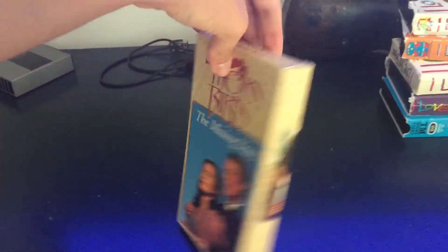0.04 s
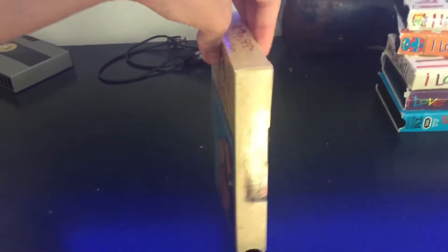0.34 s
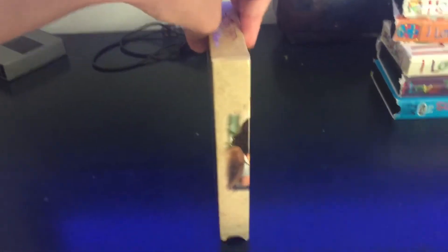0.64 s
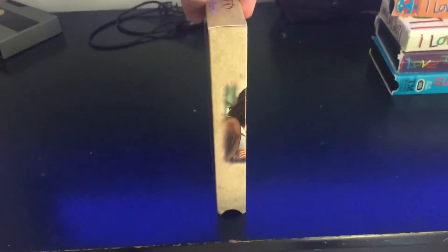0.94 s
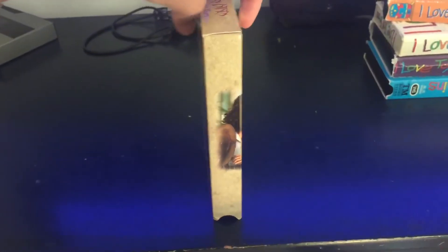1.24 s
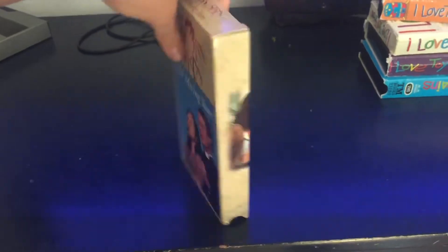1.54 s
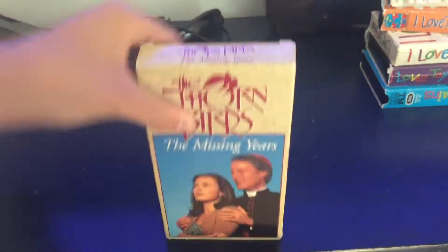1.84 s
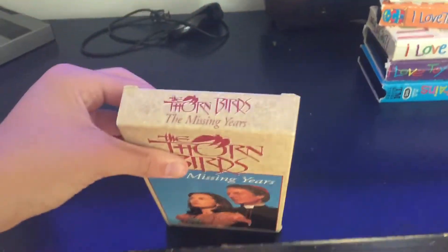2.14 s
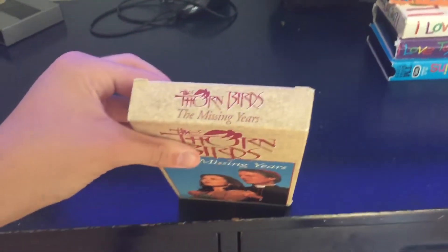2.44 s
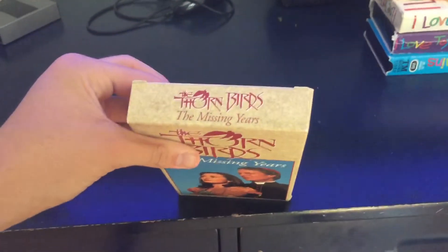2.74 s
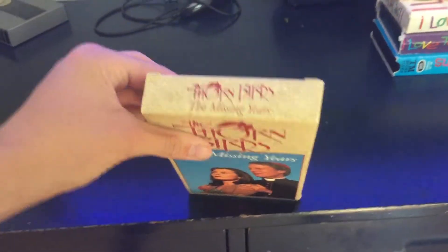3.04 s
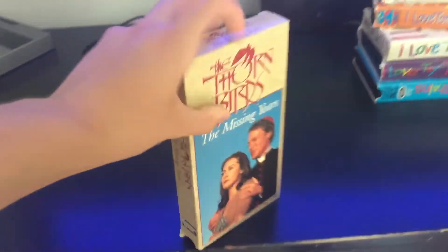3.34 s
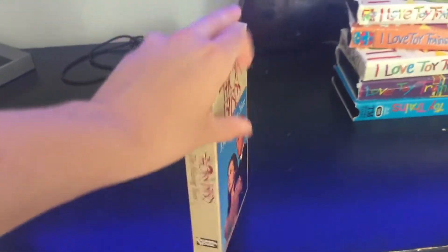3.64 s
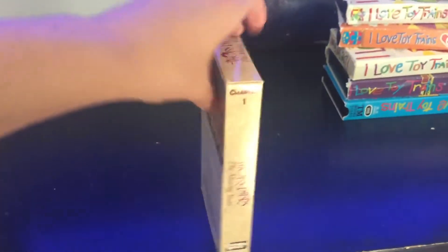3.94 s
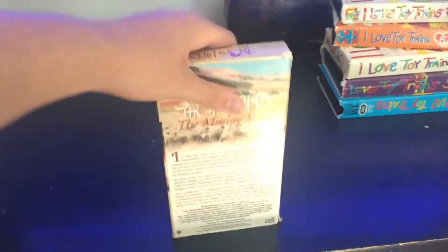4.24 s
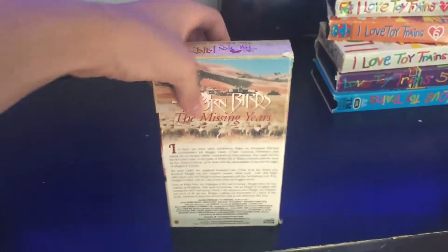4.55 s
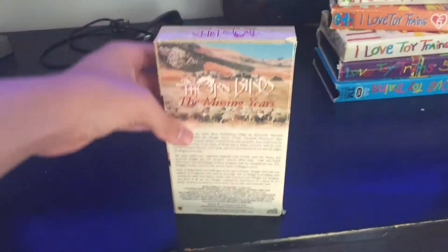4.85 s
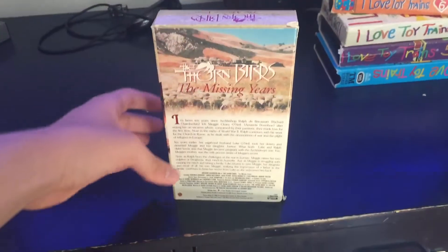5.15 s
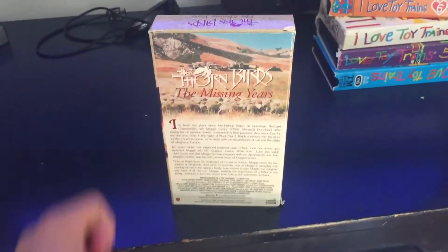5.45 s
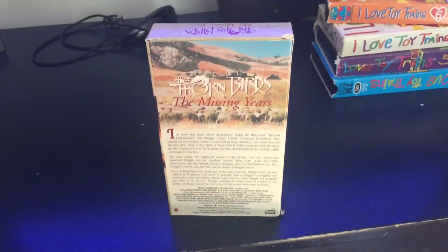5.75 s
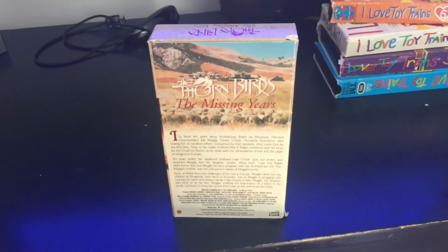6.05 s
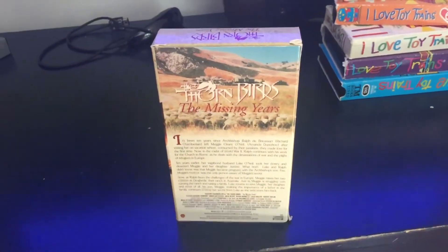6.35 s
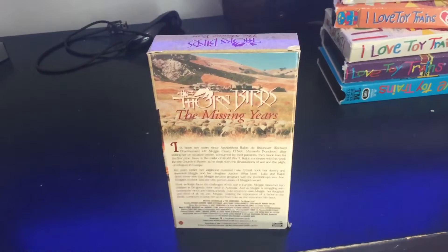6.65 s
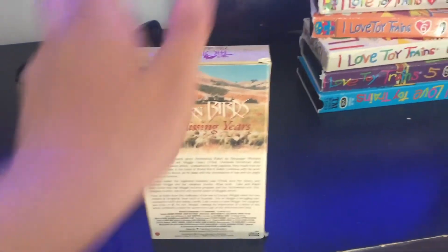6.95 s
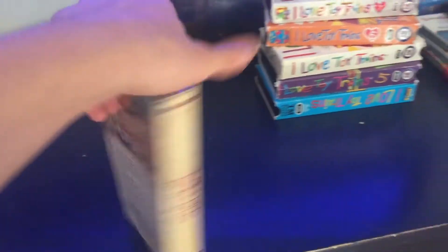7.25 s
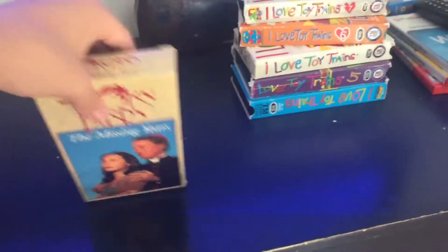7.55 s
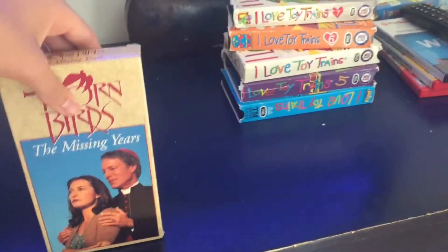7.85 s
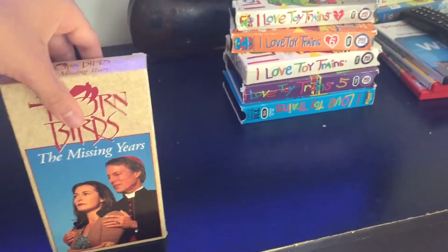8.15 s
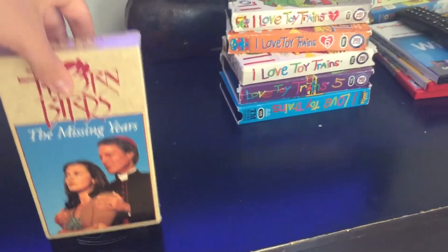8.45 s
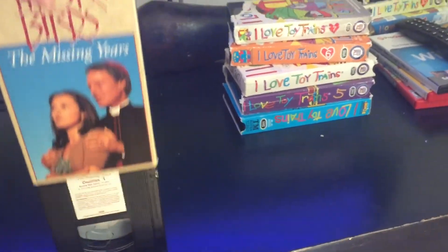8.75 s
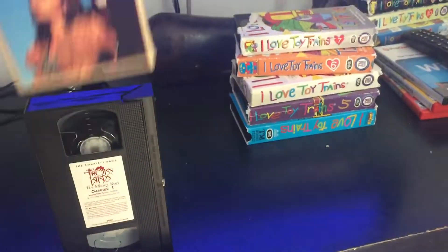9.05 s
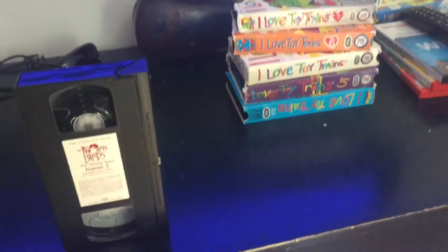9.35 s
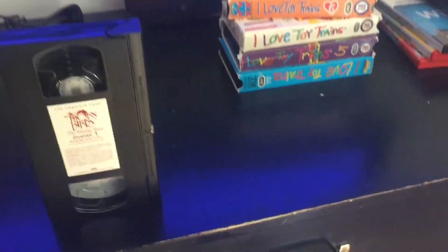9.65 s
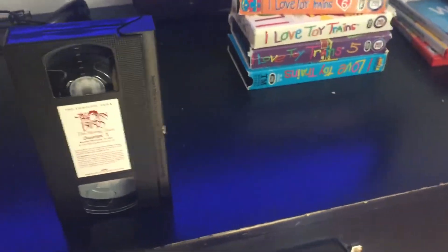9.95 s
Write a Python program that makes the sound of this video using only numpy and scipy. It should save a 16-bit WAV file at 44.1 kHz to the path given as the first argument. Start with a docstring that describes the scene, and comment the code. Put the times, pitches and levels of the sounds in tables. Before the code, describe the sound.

A plastic video cassette in a cardboard sleeve is handled on a desk, heard close in a small room over a faint, wavering low hum. At 0.5 seconds it lands with a firm hollow knock. Light ticks, a soft scuff and a tiny squeak follow around 2 seconds. From 3.2 to 4.5 seconds it is turned with short cardboard rubs and rattly knocks, strongest at 3.4 and 4.3 seconds. Only faint finger ticks come until about 6.2 seconds, then a lull. Scuffs and bumps return at 7.2 seconds, leading to two loud knocks at 7.6 and 7.8 seconds, each thudding in the desk top. From 8.4 seconds the sleeve slides off with a soft, hissing rustle, ending in a hollow pop at 9.1 seconds. The bare cassette gives a small knock at 9.7 seconds and a loud, ringing plastic clack just before 9.9 seconds.

```python
"""A plastic video cassette in its cardboard sleeve is turned on a desk, set down and unsleeved.
Each knock rattles the hollow shell, cracks at the edge and thuds in the desk top.
Cardboard rubs in tiny slips: scuffs, squeaks, then one long pull that ends in a hollow pop.
A small room rings after every contact, over a faint wavering hum."""
import sys
import numpy as np
from scipy import signal
from scipy.fft import rfft, irfft
from scipy.io import wavfile
from scipy.ndimage import uniform_filter1d

SR = 44100
rng = np.random.default_rng(int(sys.argv[2]) if len(sys.argv) > 2 else 0)


def dump_mix(stems):
    """Bounce the given channels to the path in sys.argv[1] as a 16-bit WAV at rate SR."""
    frames = np.atleast_2d(stems).T  # one column per channel
    limited = np.clip(frames, -1, 1)  # hard clip at full scale
    pcm = np.round(limited * 32767).astype(np.int16)
    wavfile.write(sys.argv[1], SR, pcm)


N = 441000
TIME_S = np.arange(N) / SR
AGE_S = np.arange(SR // 5) / SR  # time since a contact

# room noise spectrum: f/Hz, gain/dB
AIR_EQ = [(20, -2.5), (42, -10.5), (66, 9), (90, -9), (140, 6), (220, -7.5), (320, -14), (480, -15),
          (900, -14), (2500, -17.5), (6000, -22.5), (10000, -24.5), (16000, -30)]
# hum partials: f/Hz, relative level/dB
HUM_PARTIALS = [(64.6, -80), (140.0, -61.5), (301.5, -76)]
# sleeve rubs on desk and fingers: t/s, length/s, body level/dB, hiss level/dB, focus f/Hz
SCUFFS = [(0.0, 0.047, -66, -79, 810), (1.777, 0.048, -60, -66, 1400), (1.88, 0.046, -59, -70, 1250),
          (3.212, 0.053, -62, -69, 1300), (3.241, 0.067, -51.5, -60.5, 1290),
          (3.343, 0.091, -55, -72, 1200), (3.452, 0.066, -54, -60, 1000), (3.525, 0.087, -57.5, -74, 1040),
          (3.644, 0.062, -65, -78, 1390), (3.769, 0.074, -52.5, -64.5, 900), (3.86, 0.036, -58, -81, 800),
          (4.02, 0.098, -63.5, -77, 1150), (4.161, 0.038, -66, -69, 1500), (4.187, 0.09, -50.5, -63, 1000),
          (4.262, 0.054, -48, -57.5, 1100), (4.311, 0.037, -39, -50, 1300), (4.474, 0.042, -60.5, -76, 910),
          (4.581, .085, -65.5, -75, 1300), (7.199, 0.05, -51.5, -68, 1400), (7.239, 0.12, -57, -58.5, 1400),
          (7.335, 0.098, -54, -70.5, 1050), (7.427, 0.085, -50.5, -79, 940), (7.573, 0.069, -60, -70, 1400),
          (8.631, 0.044, -54, -69, 1250), (8.912, 0.058, -58.5, -66.5, 1450),
          (9.039, 0.067, -53.5, -68, 1050)]
# scuff spectra, hollow box and surface: f/Hz, gain/dB
SCUFF_BODY_EQ = [(100, -45), (330, 1), (550, 7.5), (850, 6), (1100, -0.5), (1600, 3), (2200, 0.5),
                 (3000, -17.5), (6000, -35), (16000, -63)]
SCUFF_HISS_EQ = [(1000, -47), (3000, 6), (4500, 1), (5500, 0.5), (6600, 4), (7800, -14), (9200, -4),
                 (12000, -16), (16000, -25)]
# soft pushes on the desk: t/s, level before low-pass/dB
BUMPS = [(0.061, -57.5), (0.689, -58), (1.239, -60), (1.331, -62), (1.925, -54), (1.943, -60),
         (3.28, -53.5), (3.92, -59), (4.1, -54.5), (5.103, -57.5), (5.839, -61.5), (7.326, -50.5),
         (7.355, -51), (8.12, -53.5), (8.24, -57.5)]
# desk top modes: f/Hz, relative level/dB, t60/s
DESK_MODES = [(70.1, -6, 0.073), (88, 4.5, 0.044), (118, -7, 0.079), (154.5, 1.5, 0.085),
              (217, -1.5, 0.081), (303, 0.5, 0.082), (419, -7, 0.071), (515, -11, 0.1)]
# spectrum of the desk's dense modes: f/Hz, gain/dB
BOOM_EQ = [(50, -11), (100, 9.5), (200, -5.5), (330, -7.5), (480, 0.5), (700, -1.5), (1000, -17.5),
           (2000, -37.5), (8000, -63)]
# finger touches, card and plastic settling: t/s, shell level/dB, focus f/Hz, crack level/dB
TICKS = [(0.308, -68, 930, -77), (0.374, -62, 865, -70), (1.493, -62, 840, -86), (1.574, -65, 830, -82),
         (1.691, -63, 920, -69.5), (1.782, -56, 1210, -70), (2.165, -52.5, 1400, -56),
         (2.171, -58, 1660, -60), (3.242, -60, 1080, -61), (4.011, -53.5, 1060, -61.5),
         (4.173, -61, 1560, -63.5), (4.429, -63, 1650, -72), (4.623, -64, 1270, -86),
         (4.917, -61.5, 1090, -80), (5.067, -63, 1330, -69), (5.27, -62.5, 1320, -71),
         (5.391, -63, 1280, -59.5), (5.564, -62.5, 1330, -70.5), (5.665, -61, 2080, -58),
         (6.021, -67, 820, -72), (6.195, -70, 1350, -74.5), (8.12, -62.5, 1620, -77),
         (8.378, -59.5, 732, -84), (9.696, -55.5, 990, -80), (9.817, -48, 1520, -61)]
# hollow shell modes: f/Hz, relative level/dB, t60/s
SHELL_MODES = [(520, -5, 0.12), (618, -13, 0.16), (707.5, 4.5, 0.14), (858, 5, 0.096), (971, -17, 0.049),
               (1080, 1, 0.12), (1207, 3.5, 0.1), (1306, -12, 0.26), (1646, 2.5, 0.094), (1980, -4.5, 0.02),
               (2197, 13, 0.051), (2340, 2, 0.18)]
# spectra of shell rattle and edge crack: f/Hz, gain/dB
RATTLE_EQ = [(80, -41), (180, 4.5), (400, -4), (800, 5), (1300, 4), (2000, -2), (3000, -15), (6000, -22),
             (16000, -100)]
CRACK_EQ = [(800, -21.5), (2000, 3.5), (3200, 2.5), (5500, -2.5), (9000, -8), (12000, -14.5), (16000, -16)]
# cassette hits desk: t/s, shell level/dB, focus f/Hz, desk level/dB, crack level/dB,
# rattle and crack t60/s, ring over rattle/dB
KNOCKS = [(0.5004, -28, 538, -34.5, -41, 0.025, -0.5), (1.907, -58, 850, -46, -62, 0.041, 0),
          (1.917, -52, 498, -50.5, -84, 0.027, -20), (3.377, -39, 1340, -40, -41.5, 0.062, -6),
          (3.454, -53.5, 1540, -49, -56.5, 0.041, 0), (3.691, -49, 1460, -48, -61, 0.068, -8),
          (3.756, -52.5, 850, -44.5, -66, 0.04, -1), (3.778, -60, 851, -50, -77, .06, 0),
          (3.812, -54, 950, -56, -57.5, 0.03, 10), (4.2, -50, 850, -44.5, -57.5, .047, 3),
          (4.284, -44.5, 738, -45.5, -59, .033, -17), (4.331, -36.5, 1100, -39.5, -51, 0.039, -10),
          (7.221, -47, 1630, -47, -58.5, 0.061, -11), (7.427, -56, 1190, -48.5, -61, .08, 0),
          (7.6194, -30, 1660, -36.5, -39, .05, -13), (7.7886, -28.5, 1180, -31.5, -40, .023, -3.5),
          (9.73, -38.5, 1300, -41, -56, 0.046, -23), (9.859, -24.5, 966, -55, -47.5, 0.092, 4)]
# glossy card squeaks: t/s, length/s, f/Hz, resonator width/Hz, level/dB
SQUEAKS = [(1.759, .13, 1120, 200, -56.5), (3.53, .035, 4600, 400, -65), (4.425, 0.012, 7300, 1200, -64),
           (8.47, 0.16, 6370, 1300, -65.5)]
# pull spectra, hollow box and surface: f/Hz, gain/dB
PULL_BODY_EQ = [(200, -28), (500, -5), (800, 3.5), (1200, 1), (1700, 3), (2400, -4), (3300, -3.5),
                (6000, -5), (16000, -47)]
PULL_HISS_EQ = [(1000, -21), (3000, -8), (4500, -6), (6600, 10.5), (9000, 4.5), (12000, -0.5), (16000, -9)]
# room reverberation: f/Hz, level re input/dB, t60/s
ROOM_BANDS = [(80, -13.5, 0.25), (250, 0.5, 0.34), (604, -3.5, 0.33), (1180, -9.5, .35), (2980, -4.5, 0.22),
              (7140, -8.5, 0.29), (15000, -5.5, 0.093)]


def undb(db):
    """Decibels to gain."""
    return 10 ** (np.asarray(db) / 20)


def decay(t_s, t60_s):
    """Free decay, 60 dB down at t60_s."""
    return np.exp(-np.log(1000) * t_s / t60_s)


def unit_rms(x):
    """Scale to rms 1."""
    return x / np.sqrt(np.mean(x ** 2))


def unit_hit(x):
    """Scale a transient to the energy of 20 ms at rms 1."""
    return x / np.sqrt(np.sum(x ** 2) / (SR / 50))


def add(out, t_s, x):
    """Mix x in at t_s."""
    i = int(t_s * SR)
    out[i:i + len(x)] += x[:max(N - i, 0)]


def colour(x, eq, size=4096):
    """Minimum-phase filter through (f/Hz, gain/dB) points."""
    hz, db = np.transpose(eq)
    grid_hz = np.maximum(np.fft.rfftfreq(size, 1 / SR), 1)
    gain = undb(np.interp(np.log(grid_hz), np.log(hz), db))
    cepstrum = irfft(np.log(gain))
    cepstrum[1:size // 2] *= 2
    cepstrum[size // 2 + 1:] = 0
    impulse = irfft(np.exp(rfft(cepstrum)))
    return signal.fftconvolve(x, impulse)[:len(x)]


def resonance(x, hz, q):
    """Two-pole resonance, gain 1 at centre."""
    return signal.lfilter(*signal.iirpeak(hz, q, fs=SR), x)


def narrow_noise(n, hz, q):
    """Noise through two equal resonances."""
    return resonance(resonance(rng.standard_normal(n), hz, q), hz, q)


def wander(rate_hz, n=N):
    """Smooth random drift, spread near 1."""
    hold = int(SR / rate_hz)
    steps = np.repeat(rng.standard_normal(n // hold + 1), hold)
    return np.sqrt(3 / 2) * uniform_filter1d(steps, hold)[:n]


def gate(t_s, attack_s, release_s):
    """Linear rise, hold, linear fall."""
    return np.clip(t_s / attack_s, 0, 1) * np.clip((t_s[-1] - t_s) / release_s, 0, 1)


def background(air_db=-67.5, hum_gain_db=-5, rumble_db=-70, waver_db=3.5, waver_rad=0.7, uneven_db=4):
    """Room noise, a hum wavering in level and phase, and uneven rumble at the hum's pitches."""
    air = unit_rms(colour(rng.standard_normal(N), AIR_EQ))
    hum = rumble = 0
    for hz, db in HUM_PARTIALS:
        waver = undb(waver_db * wander(13))
        phase_rad = 2 * np.pi * hz * TIME_S + waver_rad * wander(12)
        hum += undb(db) * unit_rms(waver * np.sin(phase_rad))
    for hz, _ in HUM_PARTIALS:
        rumble += undb(uneven_db * wander(16)) * unit_rms(narrow_noise(N, hz, q=2.95))
    return undb(air_db) * air + undb(hum_gain_db) * hum + undb(rumble_db) * unit_rms(rumble)


def mode_weight(hz, focus_hz, width_oct):
    """The contact spot favours modes near focus_hz."""
    return 1 / (1 + (np.log2(hz / focus_hz) / width_oct) ** 2)


def friction(n, focus_hz, body_eq, hiss_eq, slips_per_s, judder_db, panel_db, spread_db=3, grip_db=6):
    """Card fibres catch and slip: dense uneven clicks drive the hollow box and hiss at the surface."""
    sizes = undb(spread_db * np.minimum(rng.exponential(size=SR), 4))
    sizes *= rng.choice([-1, 1], SR)
    slipping = rng.random(SR) < slips_per_s / SR
    judder = undb(judder_db * wander(71.7, SR))
    slips = (slipping * sizes * judder)[:n]
    rub = colour(slips, body_eq)
    panels = 0
    for hz, _, _ in SHELL_MODES:
        grip = undb(grip_db * wander(12.24, SR)[:n])  # modes come and go as the grip moves
        panels += grip * resonance(rub, hz, q=18) * mode_weight(hz, focus_hz, width_oct=0.51)
    body = unit_rms(rub) + undb(panel_db) * unit_rms(panels)
    return unit_rms(body), unit_rms(colour(slips, hiss_eq))


def scuffs(focus_db=-1, sag_db_per_s=38):
    """The sleeve catches, weakens as it slows, and lets go; the rubbed spot favours one pitch."""
    out = np.zeros(N)
    for start_s, length_s, body_db, hiss_db, hz in SCUFFS:
        t_s = TIME_S[:int(length_s * SR)]
        body, hiss = friction(len(t_s), hz, SCUFF_BODY_EQ, SCUFF_HISS_EQ,
                              slips_per_s=3000, judder_db=2.5, panel_db=4.5)
        body = unit_rms(body + undb(focus_db) * resonance(body, hz, q=1.8))
        effort = gate(t_s, attack_s=0.01, release_s=0.022) * undb(-sag_db_per_s * t_s)
        add(out, start_s, effort * (undb(body_db) * body + undb(hiss_db) * hiss))
    return out


def chatter(t60_s, rise_s):
    """Micro-contacts build while the card edge gives way, then die."""
    rise = np.minimum(0.28 + AGE_S / rise_s, 1)
    fall = decay(np.maximum(AGE_S - rise_s, 0), t60_s)
    return rng.standard_normal(len(AGE_S)) * rise * fall


def ring(modes, weights, scatter_db, detune):
    """Damped modes; spot and grip vary per blow, and with them size, pitch and sign."""
    out = 0
    for (hz, db, t60_s), weight in zip(modes, weights):
        size, shift, sign = rng.standard_normal(3)
        gain = weight * np.sign(sign) * undb(db + scatter_db * size)
        out += gain * decay(AGE_S, t60_s) * np.sin(2 * np.pi * hz * (1 + detune * shift) * AGE_S)
    return out


def desk(db, swell_s=0.009, boom_db=-1, hollow_hz=490, hard_blow_db=-34.5):
    """The heavy top swells into its modes; dense weaker ones boom, more in the mids on a hard blow."""
    modes = ring(DESK_MODES, np.ones(len(DESK_MODES)), scatter_db=0.8, detune=0.043)
    modes *= 1 - np.exp(-AGE_S / swell_s)
    boom = unit_hit(colour(chatter(t60_s=0.031, rise_s=0.017), BOOM_EQ))
    boom += undb(1.3 * (db - hard_blow_db)) * resonance(boom, hollow_hz, q=2.5)
    return undb(db) * unit_hit(unit_hit(modes) + undb(boom_db) * boom)


def bumps(cutoff_hz=320):
    """Soft pushes move only the desk top."""
    out = np.zeros(N)
    lowpass = signal.butter(2, cutoff_hz, fs=SR)
    for t_s, db in BUMPS:
        add(out, t_s, signal.lfilter(*lowpass, desk(db)))
    return out


def shell(db, focus_hz, rattle_t60_s, rise_s, ring_db, focus_db=4):
    """The struck shell rings near focus_hz; sleeve and reels rattle around that pitch."""
    weights = mode_weight(np.array(SHELL_MODES)[:, 0], focus_hz, width_oct=0.23)
    modes = ring(SHELL_MODES, weights, scatter_db=5.5, detune=0.022)
    modes *= 1 - np.exp(-3 * AGE_S / rise_s)
    rattle = colour(chatter(rattle_t60_s, rise_s), RATTLE_EQ)
    rattle += undb(focus_db) * resonance(rattle, focus_hz, q=3.4)
    return undb(db) * unit_hit(undb(ring_db) * unit_hit(modes) + unit_hit(rattle))


def crack(db, t60_s, rise_s, ref_hz=8000, ref_db=-52, db_per_oct=22, max_hz=15800):
    """Click at the edge; a harder contact reaches higher."""
    cutoff_hz = min(ref_hz * 2 ** ((db - ref_db) / db_per_oct), max_hz)
    click = colour(chatter(t60_s, rise_s), CRACK_EQ)
    click = signal.lfilter(*signal.butter(1, cutoff_hz, fs=SR), click)
    return undb(db) * unit_hit(click)


def ticks(doubling_db=6, desk_re_shell_db=-4.5):
    """Light touches sound shell, desk and edge; the less crack, the softer and longer the contact."""
    out = np.zeros(N)
    for t_s, shell_db, hz, crack_db in TICKS:
        softness = 2 ** np.clip((shell_db - crack_db) / doubling_db, -1, 1)
        t60_s, rise_s = 0.034 * softness, 0.0006 * softness
        add(out, t_s, shell(shell_db, hz, t60_s, rise_s, ring_db=0))
        add(out, t_s, desk(shell_db + desk_re_shell_db))
        add(out, t_s, crack(crack_db, t60_s, rise_s))
    return out


def knocks():
    """The cassette meets the desk: shell, top and edge sound together."""
    out = np.zeros(N)
    for t_s, shell_db, hz, desk_db, crack_db, t60_s, ring_db in KNOCKS:
        add(out, t_s, shell(shell_db, hz, t60_s, rise_s=0.0017, ring_db=ring_db))
        add(out, t_s, desk(desk_db))
        add(out, t_s, crack(crack_db, t60_s, rise_s=0.0014))
    return out


def squeaks():
    """Slips briefly fall nearly into step and sing in one narrow band."""
    out = np.zeros(N)
    for start_s, length_s, hz, width_hz, db in SQUEAKS:
        n = int(length_s * SR)
        tone = narrow_noise(SR, hz, q=hz / width_hz)[:n]
        add(out, start_s, undb(db) * unit_rms(tone) * np.hanning(n))
    return out


def pull(start_s=8.40, end_s=9.09, speedup_s=0.23, first_hz=1570, last_hz=1150):
    """The sleeve slides off: speed brings up the hiss; the growing hollow rings lower and louder."""
    body_db, hollow_gain_db, hiss_db = -57, 2.2, -69
    attack_s, slacken_s = 0.011, 0.073
    t_s = TIME_S[:int((end_s - start_s) * SR)]
    speed = np.interp(t_s, [0, speedup_s], [0.38, 1])
    travel = np.cumsum(speed) / np.sum(speed)
    hollow_hz = 1 / ((1 - travel) / first_hz + travel / last_hz)
    body, hiss = friction(len(t_s), hollow_hz, PULL_BODY_EQ, PULL_HISS_EQ,
                          slips_per_s=6000, judder_db=1.8, panel_db=6.5)
    body *= undb(body_db + hollow_gain_db * travel) * speed * gate(t_s, attack_s, slacken_s / 2)
    hiss *= undb(hiss_db) * speed ** 1.8 * gate(t_s, attack_s, slacken_s)
    out = np.zeros(N)
    add(out, start_s, body + hiss)
    return out


def pop(t_s=9.086):
    """The sleeve's rim slips off the cassette with a hollow pop."""
    out = np.zeros(N)
    add(out, t_s, shell(db=-39, focus_hz=920, rattle_t60_s=0.049, rise_s=0.007, ring_db=-1.5))
    return out


def room(x, bands=22, build_s=0.0008):
    """Direct sound plus noise tails: each band feeds a leaking store of diffuse energy."""
    hz, db, t60_s = np.transpose(ROOM_BANDS)
    edges_hz = np.geomspace(55, 17000, bands + 1)
    diffuse, out = rng.standard_normal(N), x.copy()
    for low_hz, high_hz in zip(edges_hz[:-1], edges_hz[1:]):
        log_centre = np.log(low_hz * high_hz) / 2
        gain = undb(np.interp(log_centre, np.log(hz), db))
        leak_s = np.interp(log_centre, np.log(hz), t60_s) / np.log(1e6)
        bandpass = signal.butter(2, [low_hz, high_hz], "band", fs=SR, output="sos")
        energy = signal.sosfilt(bandpass, x + 1e-18 * diffuse) ** 2
        for tau_s in (build_s, leak_s):
            pole = np.exp(-1 / (tau_s * SR))
            energy = signal.lfilter([1 - pole], [1, -pole], energy)
        shifted = np.roll(diffuse, rng.integers(N))  # decorrelates the bands
        echoes = unit_rms(signal.sosfilt(bandpass, shifted))
        out += gain * np.sqrt(energy) * echoes
    return out


def scene(near_send=0.56, low_cut_hz=52):
    """Handling sounds over the background; ticks and pop are close, so feed the room less."""
    near = ticks() + pop()
    far = knocks() + bumps() + scuffs() + pull() + squeaks()
    handling = room(far + near_send * near) + (1 - near_send) * near
    # the handling sounds carry no deep bass
    highpass = signal.butter(3, low_cut_hz, "high", fs=SR, output="sos")
    return (signal.sosfilt(highpass, handling) + background())[None]


def record(dry, notch_hz=10450, notch_q=7, notch_depth=0.43, top_hz=15800):
    """Narrow treble dip of the microphone port, then a steep low-pass."""
    notched = signal.lfilter(*signal.iirnotch(notch_hz, notch_q, fs=SR), dry)
    dipped = dry + notch_depth * (notched - dry)
    lowpass = signal.ellip(10, 0.2, 80, top_hz, fs=SR, output="sos")
    return signal.sosfilt(lowpass, dipped)


dry = scene()
out = record(dry)
dump_mix(out)
```